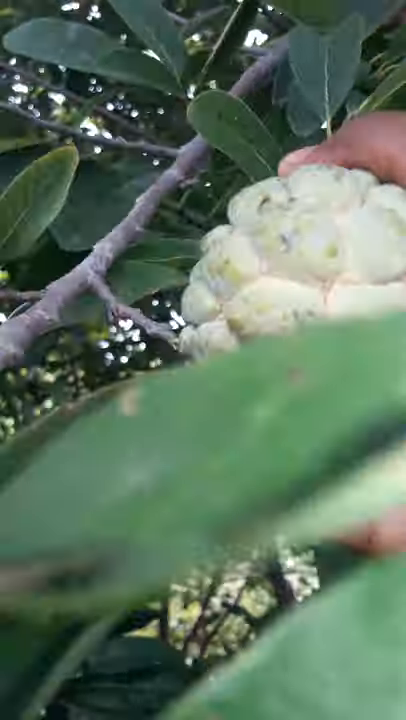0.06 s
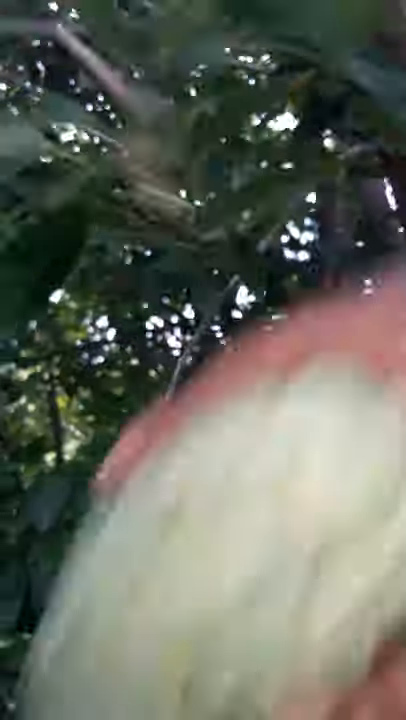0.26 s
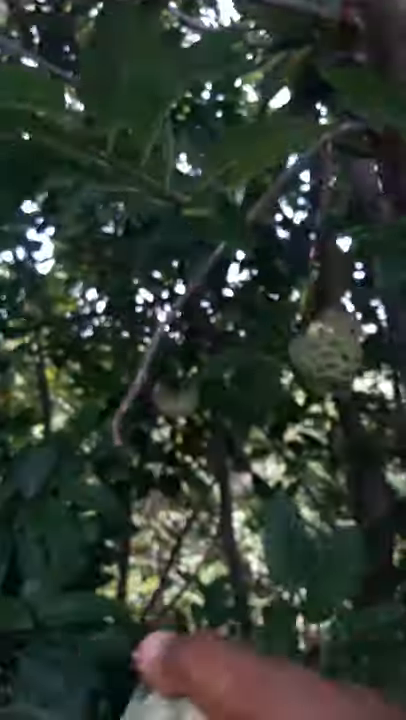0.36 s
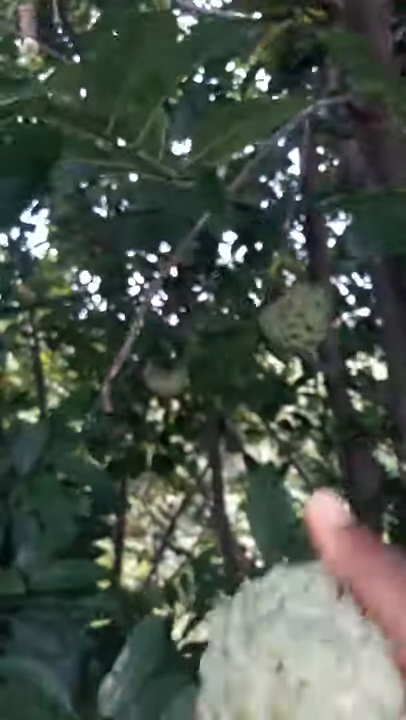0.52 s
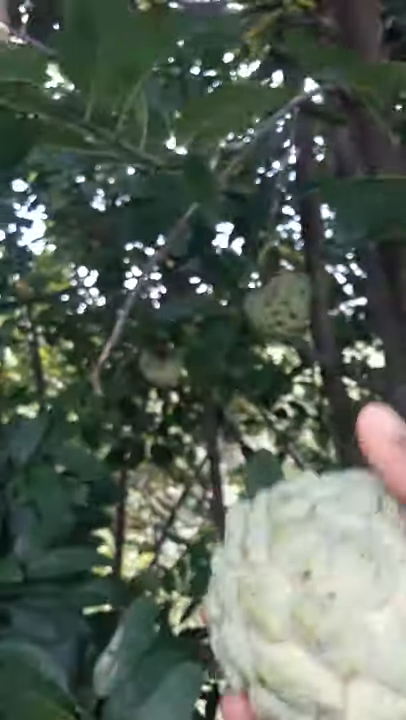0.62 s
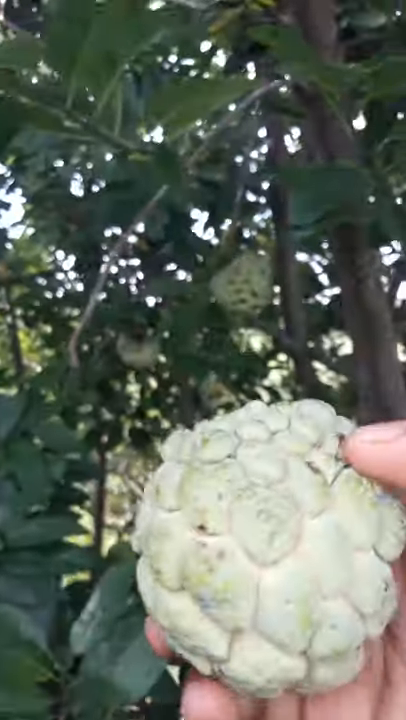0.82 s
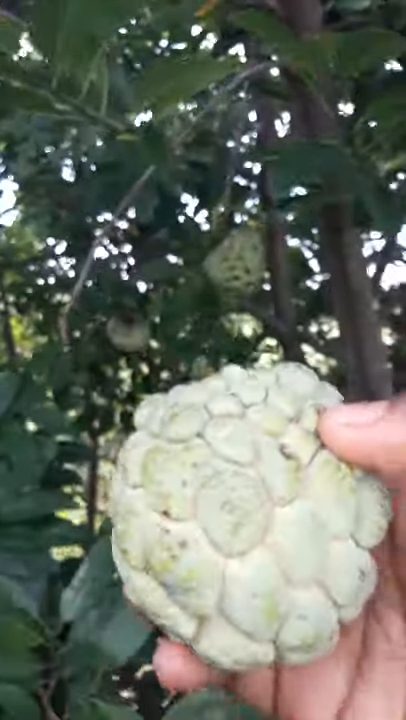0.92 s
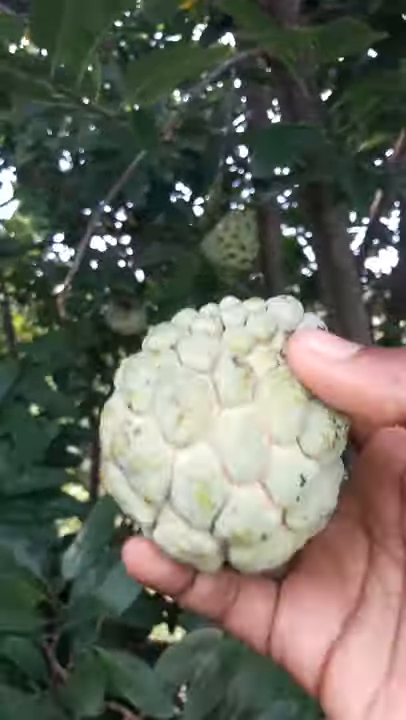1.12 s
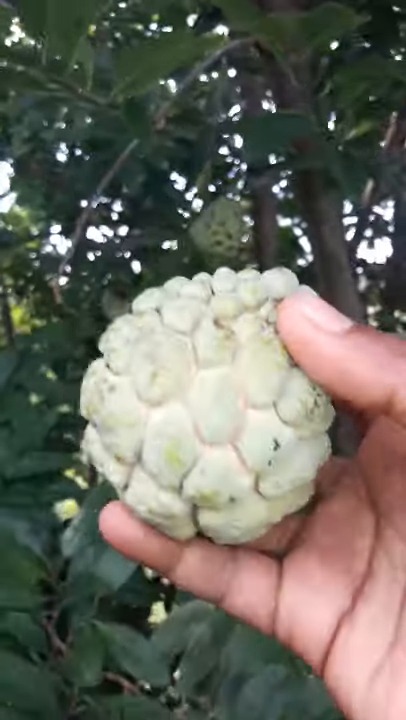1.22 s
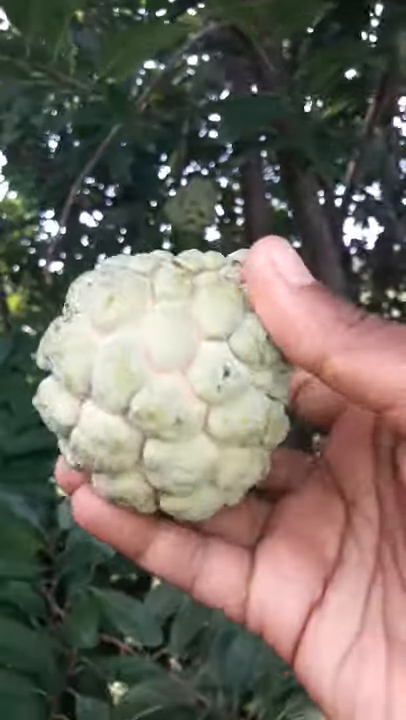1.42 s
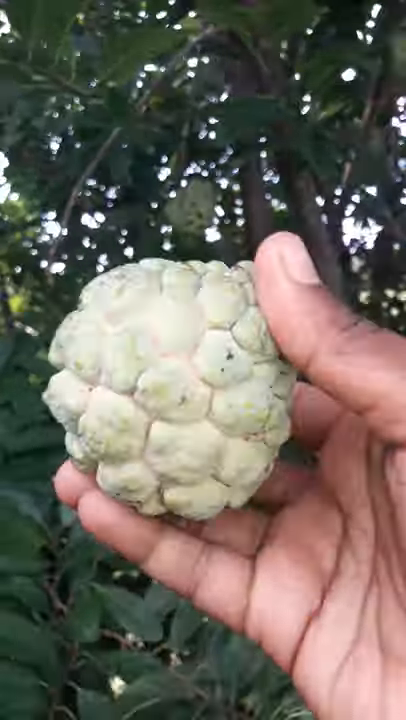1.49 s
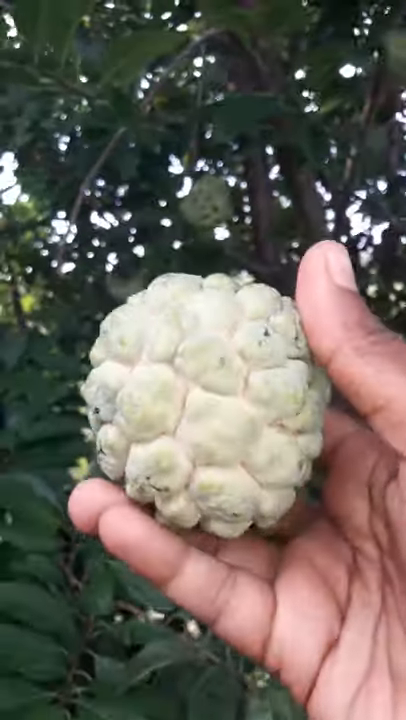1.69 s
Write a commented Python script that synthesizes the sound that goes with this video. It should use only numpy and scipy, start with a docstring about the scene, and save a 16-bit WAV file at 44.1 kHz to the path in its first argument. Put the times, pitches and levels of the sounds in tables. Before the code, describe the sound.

Close to the microphone, a stalk cracks and tears as a fruit is picked in a garden. Leaves whip back with a low thud and rustle down, while a bird softly repeats a falling whistle and others call farther off.

```python
"""A custard apple is pulled off its branch, close by, in a garden.
Leaves rustle and flick in the open air; birds call far off and a near one starts a repeated falling whistle.
The stalk cracks twice and tears, ringing the twig, and the freed branch swishes back through its leaves
and bumps the microphone. Distant twitter and a buzzing trill join in, a finger taps the fruit,
and the leaves brush and settle under the birdsong."""
import sys
import numpy as np
from scipy import signal
from scipy.fft import rfft, irfft, next_fast_len
from scipy.io import wavfile
from scipy.ndimage import uniform_filter1d

SR = 44100
rng = np.random.default_rng(int(sys.argv[2]) if len(sys.argv) > 2 else 0)


def wav_record(signal):
    """Record a signal, one row per channel, as 16-bit PCM in the file named by sys.argv[1]."""
    frames = np.transpose(np.atleast_2d(signal))
    bounded = np.clip(frames, -1, 1)
    # unit amplitude maps onto the largest positive 16-bit level
    quanta = np.round(bounded * 32767).astype(np.int16)
    wavfile.write(sys.argv[1], SR, quanta)


N = 77175
T = np.arange(N) / SR
AIR_WIDTH, LEAF_WIDTH = 0.45, 0.013   # side over middle: a wide garden, leaves almost mono
FAR_WAVER = 0.009   # pitch wander of the distant birds, as a fraction of the pitch


def from_db(db):
    """Decibels to gain."""
    return 10 ** (np.asarray(db) / 20)


def rms_one(x):
    """Scale to unit RMS."""
    return x / np.sqrt(np.mean(x ** 2) + 1e-20)


def fader(curve):
    """A gain ride through points of time in seconds and level in dB."""
    return from_db(np.interp(T, *np.transpose(curve)))


def colour(x, spectrum):
    """EQ through points of frequency in Hz and gain in dB; the result has unit RMS."""
    size = 2 * next_fast_len(N)
    hz, db = np.transpose(spectrum)
    bin_hz = np.maximum(np.arange(size // 2 + 1) * SR / size, 1)
    gain = from_db(np.interp(np.log(bin_hz), np.log(hz), db))
    cepstrum = irfft(np.log(gain))
    response = np.exp(rfft(2 * cepstrum[:size // 2], size))   # minimum phase: no ring ahead of a click
    return rms_one(irfft(rfft(x, size) * response)[..., :N])


def widen(mid, side):
    """Left and right from middle and side."""
    return np.array([mid + side, mid - side])


def grains(per_s, spread_db):
    """Tiny random contacts of uneven size."""
    sizes = from_db(spread_db * np.minimum(rng.exponential(1, N), 4))
    return sizes * rng.choice([-1, 1], N) * (rng.random(N) < per_s / SR)


def leaf_crackle(spectrum, per_s, spread_db):
    """Leaf on leaf: a dense stream of contacts, shaped by an EQ."""
    mid, side = (colour(grains(per_s, spread_db), spectrum) for _ in range(2))
    return widen(mid, LEAF_WIDTH * side)


def burst(start, decay_s):
    """An envelope that opens at once and dies away."""
    return (T >= start) * np.exp(-np.abs(T - start) / decay_s)


def ring(start, hz, t60):
    """A struck resonance that falls 60 dB in t60 seconds."""
    out, first = np.zeros(N), int(start * SR)
    age = T[:min(int(2 * t60 * SR), N - first)]
    out[first:first + len(age)] = np.sin(2 * np.pi * hz * age) * from_db(-60 * age / t60)
    return out


def knock(start, db, modes):
    """One hit rings all the resonances of a body."""
    return sum(from_db(db + mode_db) * ring(start, hz, t60) for hz, mode_db, t60 in modes)


def wobble(samples):
    """Random wander, smoothed over so many samples."""
    return rms_one(uniform_filter1d(rng.standard_normal(N), size=samples))


def tone(hz, waver):
    """A sine whose pitch wavers at random."""
    return np.sin(2 * np.pi * np.cumsum(hz * (1 + waver * wobble(samples=150))) / SR)


def note(start, length, from_hz, to_hz, db, bend=1, waver=FAR_WAVER):
    """A pure bird note that swells and fades while its pitch glides."""
    progress = np.clip((T - start) / length, 0, 1)
    hz = to_hz + (from_hz - to_hz) * (1 - progress) ** bend
    return from_db(db) * np.sin(np.pi * progress) * tone(hz, waver)


def air():
    """A steady, wide bed of open air."""
    # The tone of the air. Each row: frequency in Hz, gain in dB.
    air_eq = [(25, -20.5), (60, -2.5), (130, -3), (320, -1.5), (550, -4.5), (1000, -7), (1800, -7.5),
              (2500, -8.5), (3200, -12.5), (4300, -19), (5000, -7.5), (5700, -28), (7300, -20.5),
              (8200, -41.5), (16000, -23.5)]
    mid, side = colour(rng.standard_normal((2, N)), air_eq)
    return from_db(-62) * widen(mid, AIR_WIDTH * side)


def rustle():
    """The foliage stirs softly through the picking, then settles."""
    # The ride of the rustle. Each row: time in seconds, level in dB.
    ride = [(0, -54.5), (.09, -60), (.17, -54), (.3, -53), (.6, -52.5), (.85, -64.5), (1.0, -60.5),
            (1.15, -69), (1.3, -72.5), (1.75, -77)]
    # Its tone. Each row: frequency in Hz, gain in dB.
    rustle_eq = [(200, -1), (800, -2.5), (2400, -3.5), (3700, 1), (5800, -2.5), (7400, -0.5), (8100, -17),
                 (11000, -18), (16000, -21.5)]
    return fader(ride) * leaf_crackle(rustle_eq, per_s=5200, spread_db=4)


def leaf_flicks():
    """Stiff leaves flick against each other in bright ticks of noise."""
    # The ticks. Each row: start in seconds, level in dB.
    flicks = [(0.068, -48), (.1525, -51), (.171, -50), (0.181, -52), (0.1906, -43), (0.345, -30),
              (.3477, -29), (0.355, -25), (0.3578, -17.5), (0.3659, -26.5), (0.3656, -23), (0.3697, -28),
              (0.374, -27), (.3808, -31.5), (0.395, -35), (0.401, -25)]
    # Their tone. Each row: frequency in Hz, gain in dB.
    flick_eq = [(500, -19), (2500, -11.5), (4000, -4.5), (6800, 3), (8100, -6.5), (9000, -3.5), (11000, -9),
                (16000, -15)]
    envelope = sum(from_db(db) * burst(start, decay_s=0.0007) for start, db in flicks)
    return envelope * colour(rng.standard_normal(N), flick_eq)


def leaf_brushes():
    """Leaves slide over each other in short, grainy strokes."""
    # The strokes. Each row: start in seconds, length in seconds, level in dB.
    strokes = [(0.073, 0.0017, -57), (0.166, 0.0039, -65), (0.179, 0.01, -46.5), (0.554, 0.0045, -55),
               (0.563, 0.018, -46), (0.9012, 0.0037, -41.5), (0.91, 0.012, -48), (0.995, 0.014, -52)]
    # Their tone. Each row: frequency in Hz, gain in dB.
    brush_eq = [(80, -18.5), (380, -0.5), (550, -16), (850, 2.5), (1300, -9), (2200, -2.5), (3200, 3.5),
                (5000, -3), (6300, -9), (7400, 0.5), (8100, -24.5), (16000, -26)]
    attack_s, release_s = 0.00066, 0.0049
    envelope = np.zeros(N)
    for start, length, db in strokes:
        attack = np.clip((T - start) / attack_s, 0, 1)
        release = np.exp(-np.maximum(T - start - length, 0) / release_s)
        envelope += from_db(db) * attack * release
    return envelope * leaf_crackle(brush_eq, per_s=4500, spread_db=2.5)


def far_calls():
    """Birds farther off call in short, gliding notes."""
    # Each row: start in seconds, length in seconds, first and last pitch in Hz, level in dB.
    calls = [(0.092, 0.074, 1957, 1423, -63.5), (0.483, .07, 1994, 1987, -50),
             (0.504, 0.053, 1526, 1474, -52), (0.938, 0.073, 1890, 1970, -55),
             (1.021, 0.076, 2004, 1836, -58.5), (1.063, 0.059, 1925, 1266, -63.5),
             (1.022, 0.019, 7050, 6500, -65), (1.055, 0.018, 7140, 6400, -59.5),
             (1.087, 0.0226, 7130, 6530, -60), (1.118, 0.058, 6040, 5670, -64.5),
             (1.323, 0.077, 2827, 2844, -67.5), (1.377, .08, 1938, 1995, -60.5),
             (1.499, 0.066, 1984, 1337, -59.5)]
    return sum(note(*call, bend=1.183) for call in calls)


def near_whistles():
    """The near bird's whistle swells as its pitch sinks, then stops quickly, often with a last droop."""
    # The whistles. Each row: start in seconds, length in seconds, first pitch in Hz,
    # pitch it sinks towards in Hz, glide time in seconds, final droop in Hz, level in dB.
    whistles = [(0.172, .14, 4900, 3740, 0.095, 129, -51.5), (.478, 0.076, 5560, 3416, 0.054, 0, -46),
                (0.713, 0.091, 5480, 3695, 0.053, -2, -52), (0.898, 0.102, 5280, 3870, 0.06, 61.5, -56),
                (1.184, 0.11, 5350, 4047, .03, 520, -50)]
    attack_s, release_s, droop_s, flutter_db = 0.037, 0.016, 0.009, 2.5
    song = np.zeros(N)
    for start, length, from_hz, to_hz, glide_s, droop_hz, db in whistles:
        age = np.clip(T - start, 0, length)
        swell = np.minimum(age / attack_s, 1) ** 1.38
        release = np.minimum((length - age) / release_s, 1)
        glide = to_hz + (from_hz - to_hz) * np.exp(-age / glide_s)
        droop = droop_hz * np.exp((age - length) / droop_s)
        gain = from_db(db + flutter_db * wobble(samples=600))
        song += gain * swell * release * tone(glide - droop, waver=0.0045)
    return song


def stalk_cracks():
    """Each crack rings its splinter, the twig and the wood behind it, as tiny fibres crunch and give."""
    # Fibres of the stalk and twigs break. Each row: start in seconds, level in dB,
    # splinter pitch in Hz, crunch in dB relative to that level.
    cracks = [(0.2143, -43, 3960, -14), (0.2347, -38, 3900, -17.5), (0.2384, -25.5, 3060, -10),
              (0.2399, -8, 3730, -17.5), (0.2407, -18, 6800, -9), (0.2415, -24.5, 2900, -8.5),
              (0.2502, -27, 2950, -5.5), (0.2524, -11.5, 3270, -10), (0.272, -36, 6900, -6),
              (0.2812, -36.5, 2900, -8), (0.2869, -32.5, 3000, -9), (.3065, -36.5, 2900, -12),
              (0.311, -27, 3330, -12), (0.3362, -7, 3530, -19), (0.3573, -8.5, 4384, -6),
              (0.3581, -12.5, 6730, -10), (0.3644, -11.5, 3930, -15), (0.365, -19, 6300, -6),
              (.3745, -18, 3900, -14), (0.3815, -21, 3200, -8.5), (.4014, -29, 6400, -8.5),
              (0.449, -34, 4350, -5.5), (0.561, -31, 4100, -14), (.666, -41, 4100, -12)]
    # The twig's bright ring. Each row: pitch in Hz, gain in dB, time to fall 60 dB in seconds.
    twig_modes = [(2580, -11, 0.013), (2918, -6.5, 0.012), (3820, -16, 0.01145), (4216, -14, 0.012),
                  (4767, -16.5, 0.00986), (5360, -15, .009), (6530, -18, 0.0098), (7390, -16.5, .011)]
    # The branch's woody body. Each row: pitch in Hz, gain in dB, time to fall 60 dB in seconds.
    wood_modes = [(162, -41.5, .08), (330, -43, 0.022), (813, -34.5, 0.026), (1204, -26, 0.018)]
    # The tone of the crunch. Each row: frequency in Hz, gain in dB.
    crunch_eq = [(100, 2), (400, -21), (1200, -10.5), (2200, -18), (2700, 8), (4200, 0.5), (7400, 5),
                 (8100, -5.5), (9000, -11.5), (11000, -31), (16000, -21.5)]
    snap_band_hz, body_band_hz = [2350, 8540], [130, 1500]
    snap, body, crunch = np.zeros((3, N))
    for start, db, splinter_hz, crunch_db in cracks:
        snap += from_db(db + 1.5) * ring(start, splinter_hz, t60=0.0052)
        for k, (hz, mode_db, t60) in enumerate(twig_modes):
            gain = from_db(db + mode_db + rng.normal(0, 1))
            snap += (-1) ** k * gain * ring(start, hz, t60)   # neighbouring modes swing opposite ways
        body += knock(start, db, wood_modes)
        crunch += from_db(db + crunch_db) * burst(start, decay_s=0.0025)
    snap = signal.sosfilt(signal.butter(4, snap_band_hz, "band", fs=SR, output="sos"), snap)
    body = signal.sosfilt(signal.butter(2, body_band_hz, "band", fs=SR, output="sos"), body)
    return snap + body + crunch * colour(rng.standard_normal(N), crunch_eq)


def microphone_bumps():
    """The branch and its leaves hit the microphone with low thuds."""
    # The hits. Each row: start in seconds, level in dB.
    bumps = [(0.26, -42), (0.276, -45.5), (0.335, -32), (0.3614, -25.5), (.3672, -18.5)]
    # The thud. Each row: pitch in Hz, gain in dB, time to fall 60 dB in seconds.
    thud_modes = [(76, -9.5, .06), (150, -0.5, 0.031), (270, -3.5, .022)]
    return sum(knock(start, db, thud_modes) for start, db in bumps)


def branch_swish():
    """The freed branch whips back through its leaves."""
    # The ride of the swish. Each row: time in seconds, level in dB.
    ride = [(.335, -72), (.3365, -31.5), (.348, -26), (.356, -22), (.362, -32.5), (.368, -23),
            (.378, -30.5), (.391, -34), (.403, -29.5), (.415, -39), (.43, -42.5), (.47, -48.5),
            (.58, -60.5), (.72, -93), (.85, -86)]
    # Its tone. Each row: frequency in Hz, gain in dB.
    swish_eq = [(50, -19.5), (140, -5.5), (350, -5.5), (600, -5.5), (1500, -8.5), (2250, -8.5), (2700, -2),
                (4000, -3.5), (5500, -3.5), (7200, 4), (8000, -15.5), (8800, -9.5), (10500, -17),
                (16000, -25.5)]
    return fader(ride) * leaf_crackle(swish_eq, per_s=16000, spread_db=3)


def twitter():
    """Small birds far away scatter short, falling chips at random moments."""
    count, from_s, length_s, fall_hz = 14, 0.48, 0.02357, 362
    starts = from_s + (T[-1] - from_s) * (np.arange(count) + rng.random(count)) / count
    pitches_hz = rng.normal(4930, 210, count)
    return sum(note(start, length_s, hz + fall_hz / 2, hz - fall_hz / 2, db=-65)
               for start, hz in zip(starts, pitches_hz))


def trills():
    """A bird's note pulses fast and unevenly, so that it buzzes."""
    # Each row: start in seconds, length in seconds, first and last pitch in Hz, level in dB.
    calls = [(0.616, 0.143, 2200, 2350, -56.5), (1.524, .28, 2360, 2350, -62)]
    pulsing = 1 + 0.58 * tone(hz=65.1, waver=0.24)
    return pulsing * sum(note(*call, waver=0.0351) for call in calls)


def fruit_tap():
    """A finger lands on the fruit with a soft, hollow tap."""
    # The fruit's ring. Each row: pitch in Hz, gain in dB, time to fall 60 dB in seconds.
    fruit_modes = [(405, -5, 0.085), (815, -0.5, 0.042), (910, -1, 0.038)]
    return knock(start=0.9015, db=-45.5, modes=fruit_modes)


def tree_echo(song):
    """The trees scatter birdsong into a faint, wide tail."""
    echo_db, t60_s = -12.5, 0.7
    tails = rng.standard_normal((2, N)) * from_db(-60 * T / t60_s)
    mid, side = (signal.fftconvolve(song, tail / np.sqrt(np.sum(tail ** 2)))[:N] for tail in tails)
    return from_db(echo_db) * widen(mid, AIR_WIDTH * side)


def scene():
    """The picking close and dry in front, the birds and the garden behind."""
    picking = stalk_cracks() + microphone_bumps() + fruit_tap()
    leaves = leaf_flicks() + branch_swish() + leaf_brushes() + rustle()
    birds = near_whistles() + far_calls() + trills() + twitter()
    return picking + leaves + birds + tree_echo(birds) + air()


def record(dry):
    """The deep bass is rolled off and the top is cut steeply."""
    low_cut_hz, high_cut_hz = 69, 15900
    thinned = signal.sosfilt(signal.butter(3, low_cut_hz, "high", fs=SR, output="sos"), dry)
    return signal.sosfilt(signal.ellip(10, .2, 80, high_cut_hz, fs=SR, output="sos"), thinned)


dry = scene()
out = record(dry)
wav_record(out)
```